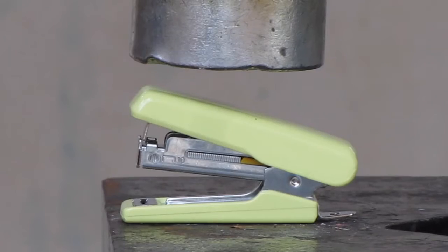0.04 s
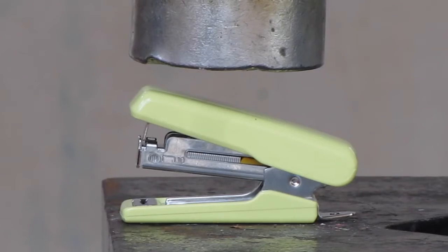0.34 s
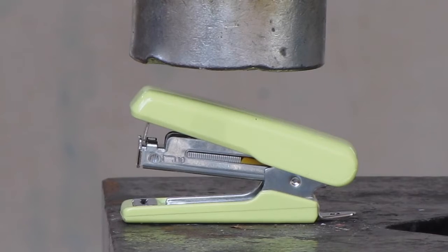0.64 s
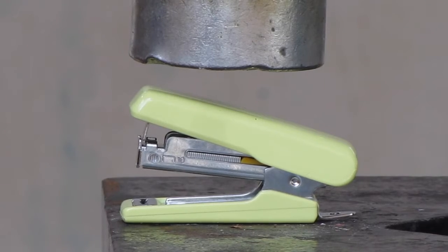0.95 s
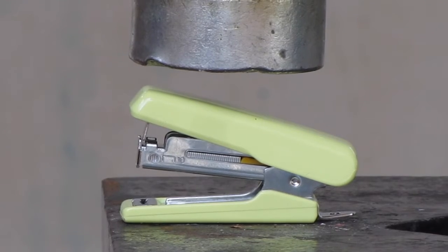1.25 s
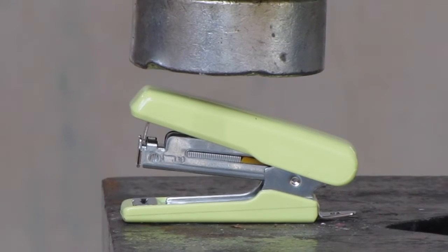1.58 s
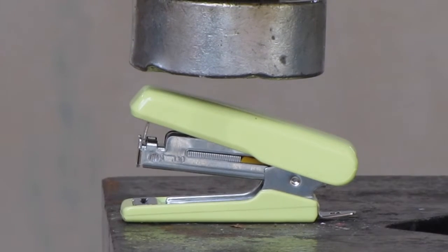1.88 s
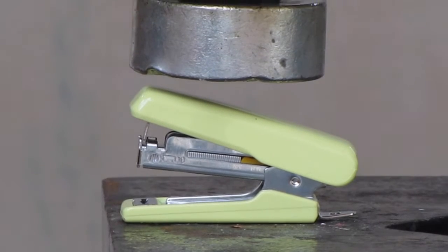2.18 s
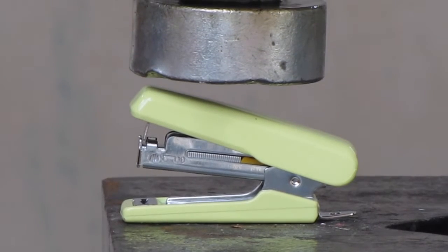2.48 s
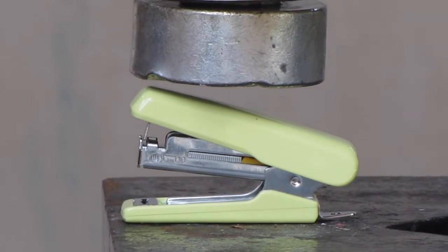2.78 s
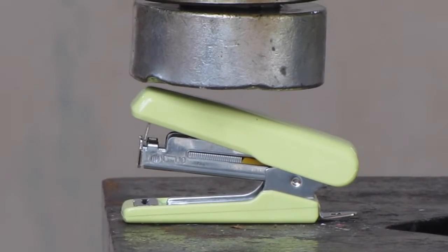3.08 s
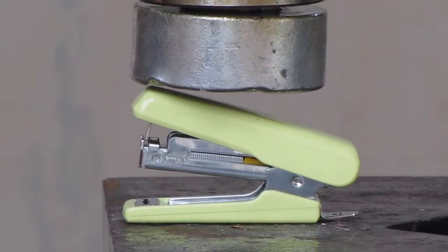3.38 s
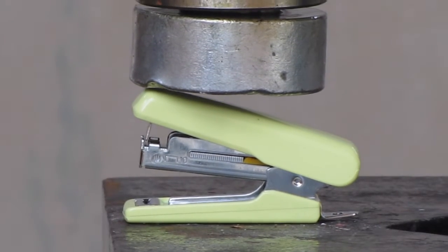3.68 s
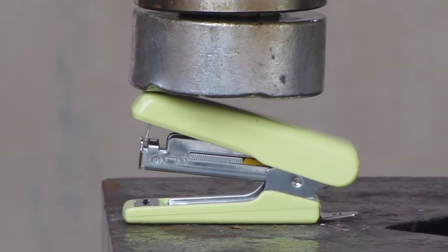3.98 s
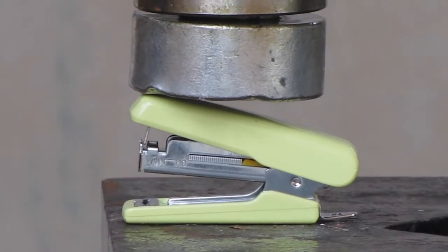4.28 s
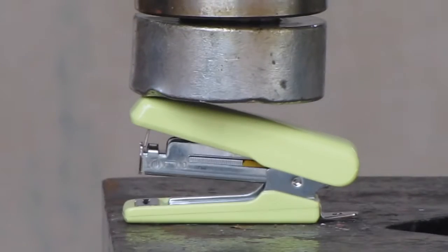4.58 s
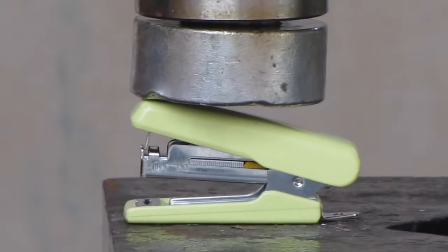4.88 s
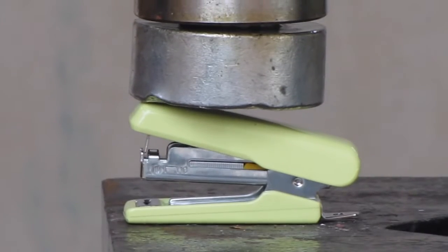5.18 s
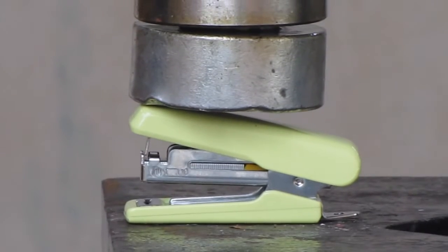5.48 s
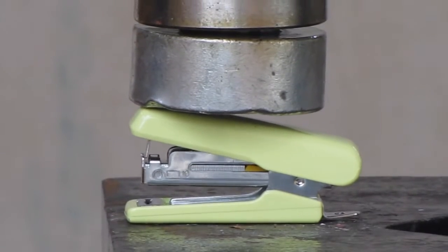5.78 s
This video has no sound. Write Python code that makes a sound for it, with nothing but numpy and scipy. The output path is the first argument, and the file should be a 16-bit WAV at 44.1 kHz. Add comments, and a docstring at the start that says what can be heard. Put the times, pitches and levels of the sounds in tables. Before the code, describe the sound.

Heard from nearby in a quiet workshop, a hydraulic press starts with a short squeak and a sharp valve clack. Its pump runs in a rapid, regular stream of hissing puffs, with soft piston thuds and ticking underneath. A quick cluster of knocks marks the ram meeting a plastic stapler, followed later by a few faint ticks. As the drive takes the load, it hums and a whine builds while the chuffing carries on.

```python
"""A hydraulic press starts up and squeezes a small plastic stapler.
Faint scuffs sound over workshop rumble. At 1.2 s a valve leaks, squeaks and clacks open; the pump then
chuffs about 13 times a second, each stroke a puff of hiss, a soft piston thud and check valve ticks.
At 2.8 s the ram knocks against the stapler, which ticks under the squeeze from 4.4 s.
At 4.75 s the drive comes under load and settles into a hum, with a whine building behind it."""
import sys
import numpy as np
from scipy import signal
from scipy.fft import rfft, irfft, next_fast_len
from scipy.io import wavfile
from scipy.ndimage import map_coordinates

SR = 44100
rng = np.random.default_rng(int(sys.argv[2]) if len(sys.argv) > 2 else 0)


def bounce(signal):
    """Save signal as a 16-bit WAV file at the path given by the first command-line argument."""
    frames = np.transpose(np.atleast_2d(signal))
    limited = np.clip(frames, -1, 1)
    pcm = np.round(limited * 32767).astype(np.int16)
    wavfile.write(sys.argv[1], SR, pcm)


N = 266805
TIME_S = np.arange(N) / SR
START_S = 1.257  # pump starts
RUNNING = TIME_S > START_S


def amp(db):
    """Decibels to gain."""
    return 10 ** (np.asarray(db) / 20)


def unit_rms(x):
    """Scale to rms 1."""
    return x / np.sqrt(np.mean(x ** 2) + 1e-20)


def along(points, hz):
    """Interpolate (f/Hz, value) points on a log axis."""
    f, values = np.transpose(points)
    return np.interp(np.log(hz + 1), np.log(f + 1), values)


def ramp(start_s, length_s):
    """Linear rise from 0 to 1."""
    return np.clip((TIME_S - start_s) / length_s, 0, 1)


def wobble(rate_hz):
    """Smooth random curve, rms about 1."""
    knots = rng.standard_normal(int(N * rate_hz / SR) + 4)
    return map_coordinates(knots, [TIME_S * rate_hz])


def filtered(x, response):
    """Apply a gain given as a function of f/Hz."""
    size = next_fast_len(N + SR // 2)
    return irfft(rfft(x, size) * response(np.fft.rfftfreq(size, 1 / SR)), size)[..., :N]


def noise(colour_db, coherence):
    """Stereo noise, rms 1, of given spectrum and left-right coherence."""
    def mid_side_gains(hz):
        angle = np.arccos(along(coherence, hz)) / 2
        return amp(colour_db(hz)) * [np.cos(angle), np.sin(angle)]
    mid, side = filtered(rng.standard_normal((2, N)), mid_side_gains)
    return unit_rms(np.array([mid + side, mid - side]))


def harmonics(table, turns, waver_db):
    """Wavering sines at multiples of a machine's speed."""
    return sum(np.sqrt(2) * amp(db + waver_db * wobble(8))
               * np.sin(2 * np.pi * (order * turns + rng.random())) for order, db in table)


def strike(at_s, peak_db, modes):
    """One blow rings decaying modes; phase drift stands for a cluster of close modes around each."""
    t = np.arange(SR // 4) / SR
    scatter_db = rng.normal(0, 1.5, len(modes))
    phases = rng.random((len(modes), 1))
    drifts = phases + np.cumsum(rng.standard_normal((len(modes), len(t))), axis=1) / np.sqrt(SR)
    ring = 0
    for (hz, db, t60_s), offset_db, drift in zip(modes, scatter_db, drifts):
        cycles = hz * t + drift * (1 + np.sqrt(hz / 1000))
        ring += amp(db + offset_db - 60 * t / t60_s) * np.sin(2 * np.pi * cycles)
    ring *= 1 - np.exp(-t / 0.00008)
    return np.pad(amp(peak_db) * ring / np.abs(ring).max(), (round(at_s * SR), N))[:N]


def walls(x, t60_s, wet_db):
    """Nearby surfaces add a short diffuse stereo tail."""
    t = np.arange(SR // 3) / SR
    tail = rng.standard_normal((2, len(t))) * amp(-60 * t / t60_s)
    tail /= np.linalg.norm(tail[0])
    return x + amp(wet_db) * signal.fftconvolve(x[None], tail, axes=1)[:, :N]


def frame_echoes(x, echo_db, count=12):
    """Weak reflections off the steel frame comb the sound."""
    delays_s = rng.uniform(.002, .025, (count, 1)) + rng.uniform(0, .0001, (count, 2))
    copies = sum(np.array([np.pad(side, (int(s * SR), 0))[:N] for side, s in zip(x, pair)])
                 for pair in delays_s)
    return (x + amp(echo_db) * copies / np.sqrt(count)) / np.hypot(1, amp(echo_db))


# rumble and room noise spectra: f/Hz, relative level/dB
RUMBLE_SPECTRUM = [(12, -28), (20, -3.5), (45, 0), (80, -10.5), (115, -15.5), (170, -27), (400, -50),
                   (2000, -100)]
ROOM_SPECTRUM = [(20, -10), (150, -1.5), (250, 6), (410, -4.5), (750, 0.5), (1200, 0), (1900, -3.5),
                 (2900, -12), (6000, -16.5), (10000, -18), (15500, -25)]
# diffuse field: f/Hz, left-right coherence
ROOM_COHERENCE = [(60, 0.77), (150, 1), (380, 0.93), (950, 0.76), (2400, .43), (6000, 0), (15000, 0)]
def workshop(whistle_hz=7817):
    """Rumble, room noise and an electrical whistle slowly grow louder; at 1.26 s the two noises drop to a
    steady level."""
    creep, settled = ramp(0, START_S), ramp(START_S, 0.16)
    rumble_db = (-73 + 6.5 * creep) * (1 - settled) - 77.5 * settled + 1.5 * wobble(7.2)
    rumble = amp(rumble_db) * noise(lambda hz: along(RUMBLE_SPECTRUM, hz), PRESS_COHERENCE)
    room_db = (-72.5 + 5.5 * creep) * (1 - settled) - 70.5 * settled + .8 * wobble(16)
    room = amp(room_db) * noise(lambda hz: along(ROOM_SPECTRUM, hz), ROOM_COHERENCE)
    whistle_db = np.array([[-81], [-84.5]]) + 4 * creep
    cycles = whistle_hz * TIME_S + .1 * wobble(60) + np.array([[.24], [0]])
    return rumble + room + amp(whistle_db) * np.sin(2 * np.pi * cycles)


# scuffs and bumps: t/s, level/dB, half-length/s, centre f/Hz, half-width/octaves
SCUFF_EVENTS = [(.06, -78, 0.046, 3500, .9), (0.256, -70.5, 0.028, 400, 1.3), (0.273, -78, 0.071, 3900, .6),
                (.455, -71, 0.054, 6350, .96), (.772, -78, 0.017, 3700, 0.55), (.952, -67, 0.07, 119, 0.12),
                (1.08, -74, 0.016, 6000, 1.2), (1.155, -66.5, .01, 4900, 0.64)]
def scuffs():
    """Brief swells of friction noise, each in its own band."""
    swells = 0
    for at_s, db, half_s, centre_hz, octaves in SCUFF_EVENTS:
        band_db = lambda hz: -20 * np.log10(1 + (np.log2((hz + 1) / centre_hz) / octaves) ** 4)
        envelope = amp(db) * np.exp(-((TIME_S - at_s) / half_s) ** 2)
        swells += envelope * noise(band_db, ROOM_COHERENCE)
    return swells * amp(2.5 * wobble(140))


# drive rattle: f/Hz, relative level/dB
RATTLE_SPECTRUM = [(30, -23), (90, 4), (160, -4.5), (400, 1), (750, 0), (1100, -5), (2000, -11),
                   (6000, -62)]
# drone: shaft order, relative level/dB
DRONE_ORDERS = [(2, -76), (3, -75), (4, -67), (5, -69), (8, -75), (11, -76), (14, -87), (15, -79),
                (17, -75)]
# whine: shaft order, full level/dB, slide per turn/orders, flutter/dB, t/s at full level
WHINE_NOTES = [(22, -56, 1.3, 4.5, 5.37), (30, -61.5, 3.5, 2, 5.3), (40, -64.5, 6, 5, 5.36)]
def drive_hum(shaft_hz=23.73, load_s=4.75, growth_db_per_s=67):
    """Under load the drive drones and rattles, then whines in notes that slide up through each turn."""
    turns = shaft_hz * TIME_S + .003 * wobble(6)
    phase, swing = turns % 1, np.cos(2 * np.pi * turns)
    rattle = unit_rms(amp(2 * swing) * noise(lambda hz: along(RATTLE_SPECTRUM, hz), PRESS_COHERENCE))
    whine = 0
    for order, db, slide, flutter_db, full_s in WHINE_NOTES:
        cycles = order * turns + slide * phase * (phase - 1) / 2 + 0.025 * wobble(40)
        note = unit_rms(amp(-flutter_db * swing + 0.65 * wobble(15)) * np.sin(2 * np.pi * cycles))
        whine += amp(db + growth_db_per_s * np.minimum(TIME_S - full_s, 0)) * note
    drone = amp(1.5) * (harmonics(DRONE_ORDERS, turns, waver_db=2.5) + amp(-61) * rattle)
    return ramp(load_s, 0.055) * (drone + whine)


# pump speed: t/s, stroke rate/Hz
PUMP_SPEED = [(1.25, 13.772), (2, 13.512), (3.3, 13.503), (4.3, 13.357), (5.2, 13.286), (6.05, 13.115)]
def stroke_hz():
    """Stroke rate of the slowing pump."""
    return np.interp(TIME_S, *np.transpose(PUMP_SPEED))


def strokes():
    """Pump strokes since the start."""
    return np.cumsum(stroke_hz() * RUNNING) / SR


def stroke_impulses(phase):
    """One impulse at this phase (0-1) of every stroke."""
    return np.diff(np.floor(strokes() - phase).clip(-1), prepend=-1)


# piston thud: f/Hz, relative level/dB
THUD_SPECTRUM = [(10, -41), (30, -1), (55, 1.5), (80, -8), (110, -4), (150, -19), (250, -3), (400, -16),
                 (1500, -47)]
# frame throb: stroke order, level/dB
THROB_ORDERS = [(2, -73.5), (3, -83), (4, -75.5), (5, -83.5), (6, -86), (7, -78), (9, -87), (12, -85.5)]
def piston(frame_hz=108.2, frame_width_hz=1.3):
    """The piston thuds and shakes the frame; the 8th harmonic drifts through the frame's resonance."""
    blows = stroke_impulses(0.103) * amp(1.9 * wobble(17))
    thuds = amp(-76) * unit_rms(filtered(blows, lambda hz: amp(along(THUD_SPECTRUM, hz))))
    detuning = 2 * (8 * stroke_hz() - frame_hz) / frame_width_hz
    resonance = harmonics([(8, -72)], strokes(), waver_db=1) / np.hypot(1, detuning)
    throb = harmonics(THROB_ORDERS, strokes(), waver_db=2.5)
    return thuds + RUNNING * (throb + resonance)


# tick and bounce: stroke phase (0-1), relative level/dB
CHECK_TICKS = [(0.341, -1.5), (.53, -5.5)]
# check valve modes: f/Hz, relative level/dB, t60/s
CHECK_MODES = [(1563, -7, 0.032), (1730, 7, 0.026), (1844, 2.5, 0.018), (1940, -1, 0.027), (2200, 8, 0.013)]
def check_valve(growth_db_per_s=0.79):
    """The check valve ticks and bounces in each stroke, harder as pressure builds."""
    blows = sum(amp(db) * stroke_impulses(phase) for phase, db in CHECK_TICKS)
    force = amp(1.3 * wobble(25) + growth_db_per_s * (TIME_S - TIME_S[-1]))
    ring = strike(0, -44, CHECK_MODES)[:SR // 4]
    return signal.fftconvolve(blows * force, ring)[:N]


# ram contacts and slips: t/s, peak level before the high-pass/dB, centre f/Hz, spread/octaves
STAPLER_KNOCKS = [(2.788, -32, 2600, 1.7), (2.803, -26.5, 776, 1.07), (2.813, -33, 1210, 1.2),
                  (2.826, -39, 950, 1.2), (4.428, -50, 200, 0.28), (4.644, -41.5, 430, 0.26),
                  (4.996, -46.5, 392, 0.35)]
# stapler on the steel bed: f/Hz, relative level/dB, t60/s
STAPLER_MODES = [(203, -13, 0.072), (295, -8.5, 0.085), (363, -3, 0.066), (475, 1, 0.042),
                 (604, -0.5, 0.049), (862, 0, 0.04), (1055, -0.5, 0.034), (1234, -8.5, 0.089),
                 (1410, -5, 0.029), (1590, -12, 0.055), (1990, -6.5, 0.099), (2680, 2, 0.047),
                 (3620, 7.5, 0.018), (4000, 7, 0.013)]
def stapler(low_cut_hz=190):
    """Hard contacts ring the high modes, soft slips the low ones; the small body radiates little bass."""
    knocks = 0
    for at_s, peak_db, centre_hz, octaves in STAPLER_KNOCKS:
        modes = [(hz, db - 4 * (np.log2(hz / centre_hz) / octaves) ** 2, t60_s)
                 for hz, db, t60_s in STAPLER_MODES]
        knocks += strike(at_s, peak_db, modes)
    return signal.sosfilt(signal.butter(2, low_cut_hz, "highpass", fs=SR, output="sos"), knocks)


# valve chatter: t/s, peak level/dB
VALVE_CLACKS = [(1.2376, -28), (1.2422, -26), (1.249, -30.5), (1.254, -31)]
# valve body: f/Hz, relative level/dB, t60/s
VALVE_MODES = [(60, -20, 0.1), (129, -19, .04), (267, -17, 0.025), (550, -11.5, 0.044), (785, -6.5, 0.032),
               (1300, -6.5, 0.012), (1904, -1.5, 0.022), (2570, 3, 0.017), (2950, -5, .03),
               (3100, -1, 0.036), (3500, -4, 0.025), (4130, -4, 0.042)]
def valve(squeak_hz=4905, squeak_db=-59):
    """The leak squeaks in the seat, then the valve bounces as it opens."""
    tone = np.sqrt(2) * np.sin(2 * np.pi * (squeak_hz * TIME_S + .15 * wobble(200)))
    squeak = amp(squeak_db) * ramp(1.185, 0.023) * ~RUNNING * tone
    return squeak + sum(strike(at_s, db, VALVE_MODES) for at_s, db in VALVE_CLACKS)


def opening_flow(leak_s=0.092, surge_t60_s=0.067):
    """Flow envelope of the opening valve: a swelling leak, then one dying surge."""
    leak = amp(-38) * ramp(START_S - leak_s, leak_s) ** 1.9 * ~RUNNING
    surge = ramp(START_S, 0.0024) * amp(-28 - 60 * np.maximum(TIME_S - START_S, 0) / surge_t60_s)
    return leak + surge


def puffs(peak_phase=0.32, depth_db=6, depth_db_per_s=0.42):
    """Stroke envelope, rms 1: quick rise, long fall, emptying more fully as pressure builds."""
    phase = strokes() % 1
    before_peak = np.maximum(1 - phase / peak_phase, 0) ** 3.5
    after_peak = np.maximum((phase - peak_phase) / (1 - peak_phase), 0) ** 1.32
    dip_db = (before_peak + after_peak) * (depth_db + depth_db_per_s * (TIME_S - START_S))
    puff = RUNNING * amp(-dip_db)
    return puff / np.sqrt(np.mean(puff[RUNNING] ** 2))


# exhaust hiss: f/Hz, relative level/dB
HISS_SPECTRUM = [(100, -25), (250, -17), (500, -11), (800, -8), (1300, -9.5), (1700, -7), (2600, -1),
                 (4000, -0.5), (7000, 1.9), (9500, 1.5), (12000, 0), (16000, -4)]
# exhaust resonances: f/Hz, width/Hz, lift/dB
PORT_RESONANCES = [(1585, 43, 7.5), (1770, 54, 1.5), (2346, 35, 5), (2652, 49, 6), (3320, 160, 2.5),
                   (4380, 70, 3), (6900, 200, 1.5), (8970, 80, 3), (9430, 110, 3.5)]
# sound of the press, also used for the rumble: f/Hz, left-right coherence
PRESS_COHERENCE = [(100, .999), (600, 0.97), (1400, 0.81), (3100, 0.5), (7000, 0.62), (15000, 0.45)]
# exhaust balance: f/Hz, right minus left level/dB
RIGHT_BALANCE = [(600, -1), (1300, 1), (2400, 3), (4400, 0.5), (8000, 1.3), (15000, 3.5)]
def exhaust(resist_s=3.85, resist_drop_db=1.46, treble_hz=7000, left_lag_s=2.7e-5):
    """Each stroke vents a turbulent puff; the flow eases as the stapler resists."""
    def colour_db(hz):
        lift_db = sum(db / (1 + (2 * (hz - centre_hz) / width_hz) ** 2)
                      for centre_hz, width_hz, db in PORT_RESONANCES)
        return along(HISS_SPECTRUM, hz) + lift_db

    def from_right(hz):
        gain = amp(along(RIGHT_BALANCE, hz) / 2)
        return np.array([np.exp(-2j * np.pi * hz * left_lag_s) / gain, gain])

    puff = puffs()
    flow_db = -39.5 - resist_drop_db * ramp(resist_s, 0.7) + 0.49 * wobble(20)
    flow = np.hypot(puff * amp(flow_db), opening_flow())
    turbulence = amp(0.23 * wobble(700))
    jet = flow * turbulence * frame_echoes(noise(colour_db, PRESS_COHERENCE), echo_db=-11.5)
    treble = filtered(jet, lambda hz: hz ** 2 / (hz ** 2 + treble_hz ** 2))
    jet += 1.06 * (puff - 1) * RUNNING * treble  # a faster jet is brighter
    return filtered(jet, from_right)


def scene():
    """The press at work in the workshop."""
    pump = exhaust() + piston() + check_valve() + drive_hum()
    impacts = walls(valve() + stapler(), t60_s=0.11, wet_db=-15.5)
    return pump + impacts + scuffs() + workshop()


def record(dry):
    """Brick-wall low-pass."""
    return filtered(dry, lambda hz: hz < 15980)


dry = scene()
out = record(dry)
bounce(out)
```